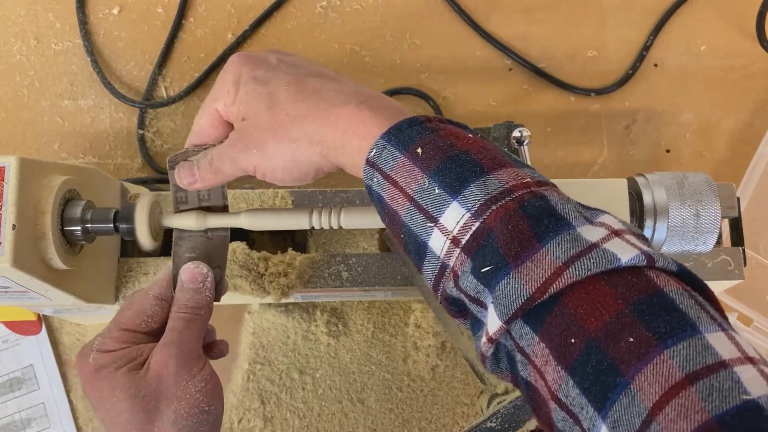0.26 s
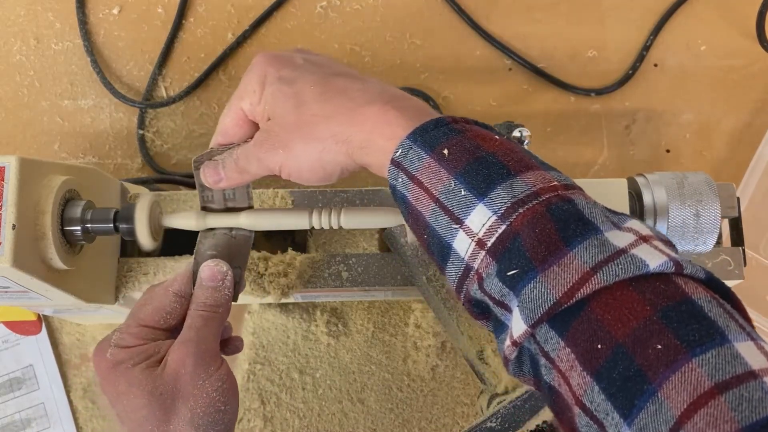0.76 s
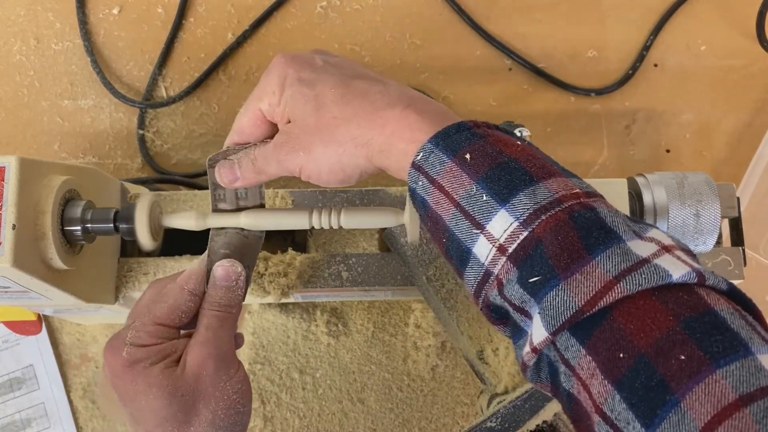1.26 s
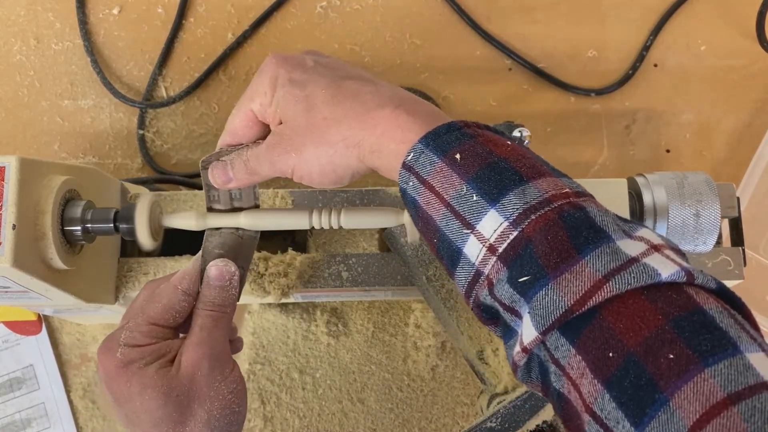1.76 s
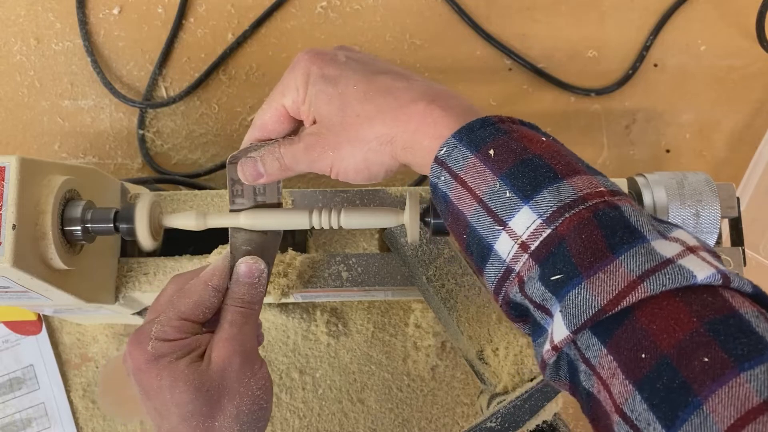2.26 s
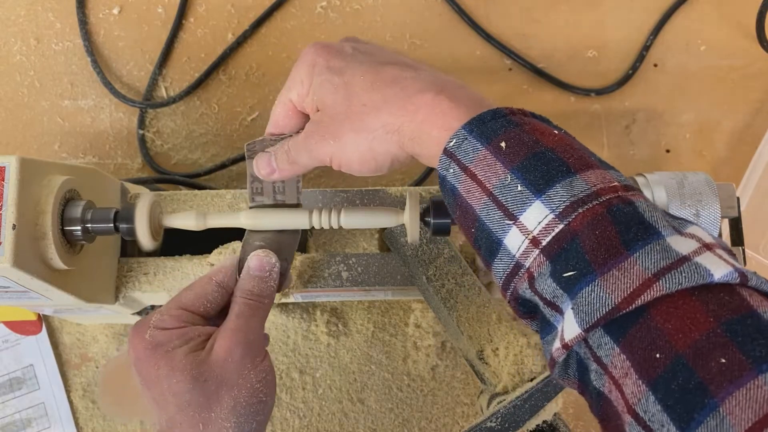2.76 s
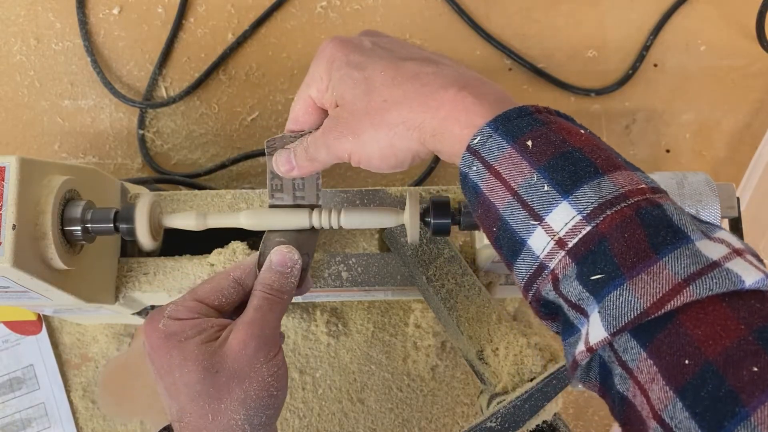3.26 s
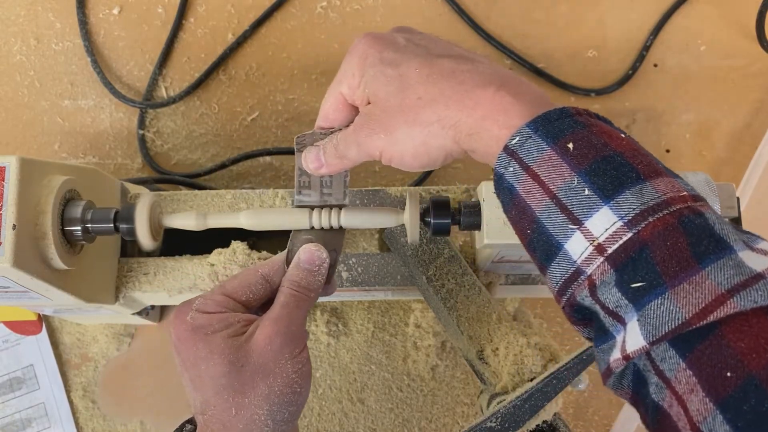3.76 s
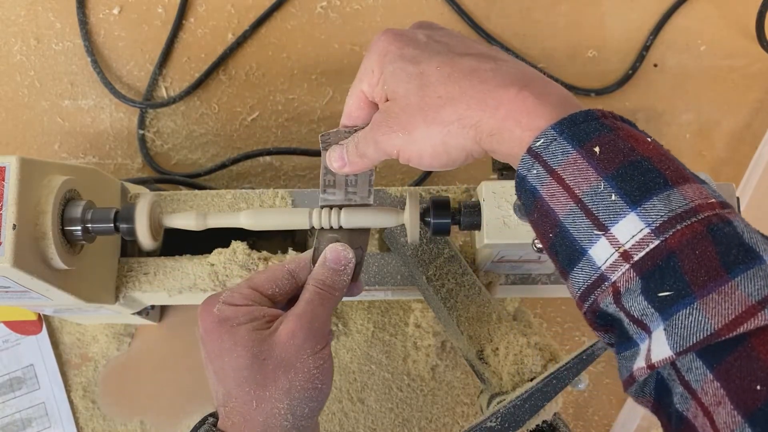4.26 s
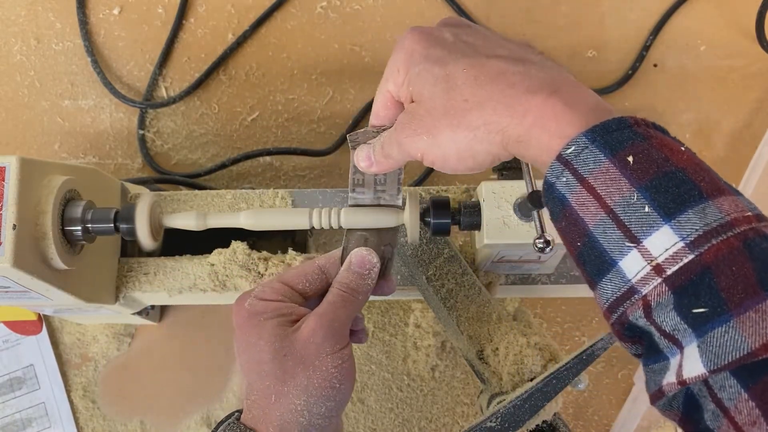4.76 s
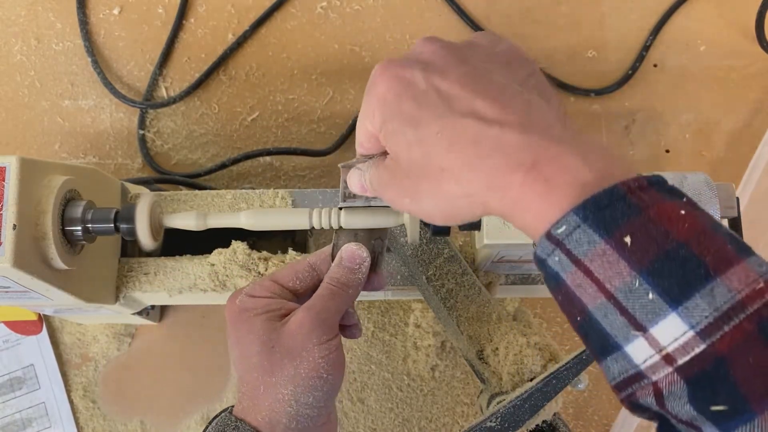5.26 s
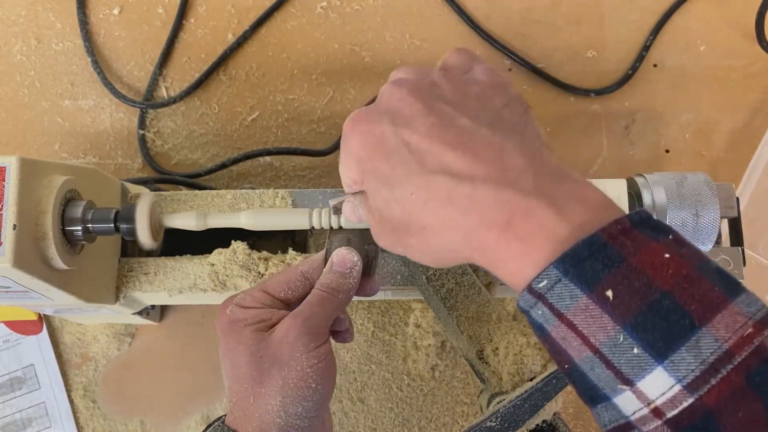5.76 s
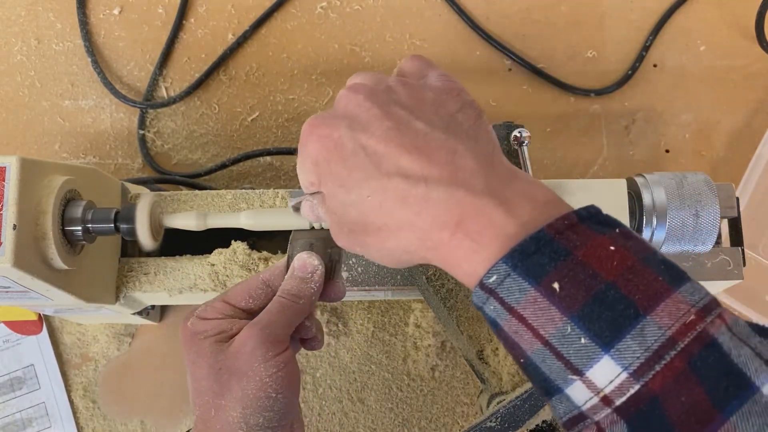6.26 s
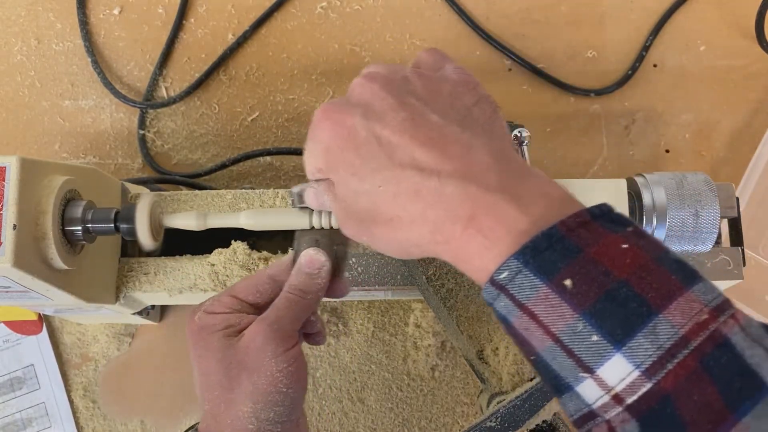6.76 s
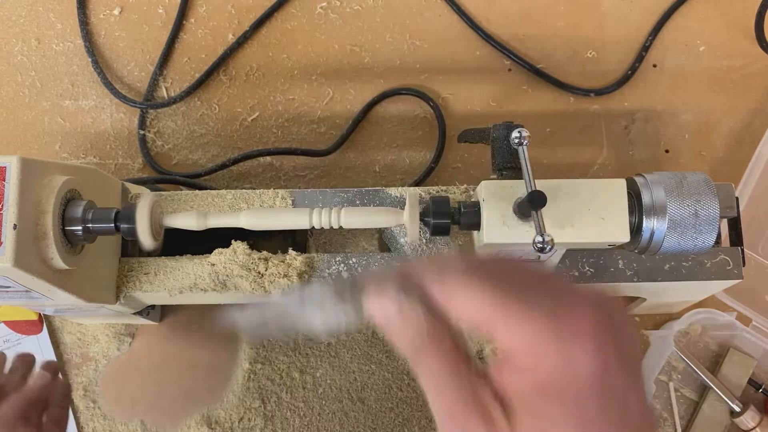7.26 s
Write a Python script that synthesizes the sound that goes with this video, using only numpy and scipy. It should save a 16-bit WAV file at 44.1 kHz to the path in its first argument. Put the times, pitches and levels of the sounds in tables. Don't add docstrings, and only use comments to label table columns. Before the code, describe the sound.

Steady throbbing motor hum and whirr with bright, gritty sandpaper hiss on thin turning wood; the hiss stops, then a sharp plastic click.

```python
import sys
import numpy as np
from scipy import signal
from scipy.fft import rfft, irfft, next_fast_len
from scipy.io import wavfile
from scipy.ndimage import uniform_filter1d, map_coordinates

SR = 44100
rng = np.random.default_rng(int(sys.argv[2]) if len(sys.argv) > 2 else 0)


def bounce(signal):
    frames = np.transpose(np.atleast_2d(signal))
    limited = np.clip(frames, -1, 1)
    pcm = np.round(limited * 32767).astype(np.int16)
    wavfile.write(sys.argv[1], SR, pcm)


def linear_from_db(decibels):
    return 10 ** (np.asarray(decibels, float) / 20)


N = 331632
TIME_S = np.arange(N) / SR
LIFT_S = 6.965
GRIP_EASES_S = (6.8, 6.9)


def unit(x):
    return x / np.sqrt(np.mean(x ** 2) + 1e-20)


def along(points, hz):
    f, v = np.transpose(points)
    return np.interp(np.log(hz + 1), np.log(f + 1), v)


def curves(rows):
    s, *columns = np.transpose(rows)
    return [np.interp(TIME_S, s, column) for column in columns]


def ramp(start_s, end_s):
    return np.clip((TIME_S - start_s) / (end_s - start_s), 0, 1)


def wobble(rate):
    knots = rng.standard_normal(int(N * rate / SR) + 4)
    return map_coordinates(knots, [np.arange(N) * rate / SR])


def filtered(x, response):
    m = next_fast_len(N + 8192)
    return irfft(rfft(x, m) * response(np.fft.rfftfreq(m, 1 / SR)), m)[..., :N]


def band(hz, centre_hz, width_hz):
    return 1j * hz * width_hz / (centre_hz ** 2 - hz ** 2 + 1j * hz * width_hz)


def patchy(patchy_db, grain_db=0):
    z = signal.stft(rng.standard_normal((2, N)), nperseg=512)[2]
    field = uniform_filter1d(rng.standard_normal(z.shape[1:]), size=8, axis=0)
    field = uniform_filter1d(field, size=10, axis=1)
    pair = signal.istft(z * linear_from_db(patchy_db * unit(field)), nperseg=512)[1][:, :N]
    return pair * linear_from_db(grain_db * wobble(600))


def colour(noise, spectrum):
    return unit(filtered(noise, lambda hz: linear_from_db(along(spectrum, hz))))


# time_s, speed_turns_per_s
SPINDLE_SPEED = [(0.0, 15.716), (0.45, 15.67), (1.35, 15.676), (1.8, 15.707), (2.25, 15.716), (2.7, 15.672),
                 (3.15, 15.569), (3.6, 15.597), (4.5, 15.603), (4.95, 15.579), (5.4, 15.647),
                 (5.85, 15.513), (6.3, 15.469), (6.75, 15.529), (6.9, 15.581), (7.05, 15.88), (7.2, 15.973),
                 (7.4, 15.987)]
# overtone_number, level_db
HUM_OVERTONES = [(1, 0), (2, -19), (3, -24.5)]
# hum_overtone_number, offset_turns, level_over_throb_db
THROB_SIDEBANDS = [(1, -3, -24), (1, -2, -24), (1, -1, -5), (1, 1, 0), (1, 2, -7), (2, -1, -14),
                   (3, -3, -29), (3, -2, -28), (3, -1, -15), (3, 1, -25), (4, -1, -26), (5, 1, -27),
                   (6, -1, -27)]
# multiple_of_spindle, peak_db, unsteadiness_db
GEARED_TONES = [(3.45, -41, 1), (4.23, -41, 2), (4.77, -43, 2), (5.77, -50, 2), (6.23, -47, 2.5),
                (6.55, -41, 1.5), (8, -44, 2.5), (8.5, -51, 2.5), (13.45, -50, 2), (27.77, -52, 2),
                (42, -58, 2), (47, -53, 1), (72.85, -59, 2)]
BEARING_MULTIPLES = (18.6, 23.05, 28)
# level_db, change_when_strip_taut_db, change_after_lift_db, beat_depth_0_to_1
BEARING_LEVELS = [(-39.5, -2.5, -15, 0.56), (-43.5, -6.5, 1, 0.06), (-49.5, 5.5, -9, 0.02)]
# pitch_hz, peak_db
MAINS_HUM = [(120, -44), (240.1, -47)]


def spindle_tones():
    bench_hz, bench_width_hz = 70, 7
    start_turn, light_touch_turns_per_s = -0.380, 15.7
    belt_turns_per_turn, belt_start_turn, belt_db = .231, -.424, -14.5
    beat_period_s, first_dip_s = 2.18, 0.25

    speed, = curves(SPINDLE_SPEED)
    turns = np.cumsum(speed) / SR
    angle = 2 * np.pi * (start_turn + turns)

    def bench_phase(k):
        return k * angle + np.angle(band(k * speed, bench_hz, bench_width_hz))

    def free_tone(k):
        return np.cos(k * angle + 6 * rng.random() + 0.15 * wobble(1.86))

    hum_db = -16.6 - 1.7 * ramp(0, LIFT_S) + 1.2 * ramp(*GRIP_EASES_S) - 7.5 * ramp(7.16, 7.4)
    throb_db = -27.5 - 7.5 * (speed - light_touch_turns_per_s)
    hum_phase = bench_phase(5)
    belt_angle = 2 * np.pi * (belt_start_turn + belt_turns_per_turn * turns)
    belt = 1 + linear_from_db(belt_db + .6 * wobble(1.2)) * np.exp(1j * belt_angle)
    hum = belt * sum(linear_from_db(hum_db + db) * np.exp(1j * m * hum_phase) for m, db in HUM_OVERTONES)
    out = hum.real

    for m, offset, db in THROB_SIDEBANDS:
        sideband = np.cos((m - 1) * hum_phase + bench_phase(5 + offset))
        out = out + linear_from_db(throb_db + db + .5 * wobble(2.5)) * sideband
    for k, db, sway_db in GEARED_TONES:
        out = out + linear_from_db(db + sway_db * wobble(1.62)) * free_tone(k)

    taut, lifted = ramp(2.45, 3.3), ramp(LIFT_S - .05, LIFT_S + 0.053)
    slow_beat = np.cos(2 * np.pi * (TIME_S - first_dip_s) / beat_period_s)
    for k, (db, taut_db, lift_db, depth) in zip(BEARING_MULTIPLES, BEARING_LEVELS):
        level_db = db + taut_db * taut + lift_db * lifted + 4.0 + 0.71 * wobble(9.1)
        out = out + linear_from_db(level_db) * (1 - depth * slow_beat) / (1 + depth) * free_tone(k)
    for hz, db in MAINS_HUM:
        out = out + linear_from_db(db + 0.5 * wobble(3.2)) * np.cos(2 * np.pi * hz * TIME_S)
    return out


# pitch_hz, width_hz
BENDING_MODES = [(1215, 13), (1400, 30), (1670, 49), (1980, 30)]
MODE_QUIET = [-58, -58, -52, -51.5]
# peak_s, length_s, mode_hz, level_db
CHATTER_BOUTS = [(0.0, 0.16, 1400, -44), (.8, 0.87, 1400, -42.5), (1.094, 0.19, 1220, -46),
                 (1.12, 0.2, 1980, -50), (1.3, 0.7, 1670, -55.5), (1.598, 0.17, 1400, -48),
                 (2.2, 0.27, 1220, -53), (2.344, 0.74, 1400, -43), (2.6, 1.5, 1980, -58),
                 (2.803, 0.72, 1670, -45.5), (2.95, 0.4, 1400, -51), (3.8, .55, 1220, -46),
                 (3.8, .35, 1400, -47), (3.795, 0.37, 1670, -45), (3.85, .8, 1980, -53),
                 (4.872, 0.19, 1670, -38.5), (4.87, 0.13, 1980, -38), (5.1, 0.32, 1980, -51),
                 (5.45, 0.4, 1400, -45), (5.5, 0.47, 1980, -45), (5.55, 0.65, 1670, -47.5),
                 (6.12, .4, 1670, -44), (5.95, .7, 1980, -45), (6.15, .3, 1400, -43),
                 (6.77, 0.22, 1670, -45), (6.845, 0.14, 1400, -47), (7.0, 0.65, 1980, -49.5),
                 (7.183, 0.19, 1220, -50), (7.465, 0.13, 1220, -48)]


def chatter():
    rise_share = 0.78
    t = np.arange(0, N, 64) / SR
    strengths = []
    for quiet_db, (centre_hz, _) in zip(MODE_QUIET, BENDING_MODES):
        strength = np.full(len(t), linear_from_db(quiet_db))
        for s, length_s, hz, db in CHATTER_BOUTS:
            if abs(hz - centre_hz) < 90:
                side = np.where(t < s, rise_share, 2 - rise_share)
                strength += linear_from_db(db - 24 * ((t - s) / (length_s * side)) ** 2)
        strengths.append(np.interp(TIME_S, t, strength))
    return strengths


# pitch_hz, width_hz, level_db
CASING_MODES = [(658, 35, -6), (696, 29, -6.5), (736, 3.4, -2.5), (1141, 9.1, -24), (1300, 8.6, 1),
                (1522, 35, -3), (1797, 11.6, 1), (2260, 24, -3), (2456, 18, 2), (2624, 33, -1.5),
                (2896, 38, -4), (3920, 7.4, -1), (4115, 25, -10), (4770, 41, -7.5), (5160, 15, -9),
                (5254, 14, -4), (5910, 28, -8), (7970, 50, -9.5), (11900, 30, -12), (12400, 120, -15.5)]
# frequency_hz, level_db_per_hz
RUMBLE_COLOUR = [(20, -20), (45, -14), (75, -5.5), (115, -2), (150, -12.5), (180, -15.5), (215, -12),
                 (260, -13.5), (330, -17.5), (450, -16.5), (520, -24.5), (900, -25.5), (1500, -63)]
# frequency_hz, level_db_per_hz
AIR_COLOUR = [(300, -88), (420, -5), (600, -16.5), (1000, -2), (1500, -1.5), (3000, -3.5), (3300, -5),
              (5500, -14), (8000, -5.5), (11000, -14.5), (15100, -16), (15250, -92)]


def motor():
    chatter_db = 10 * np.log10(np.sum(np.square(chatter()), axis=0))
    casing_db = -37 + 0.1 * (chatter_db + 42) + 1.5 * ramp(LIFT_S, LIFT_S + 0.25)
    drive = patchy(0.4)
    ringing = 0
    for k, (centre_hz, width_hz, db) in enumerate(CASING_MODES):
        mode = filtered(drive, lambda hz: band(hz, centre_hz, width_hz))
        ringing = ringing + (-1) ** k * linear_from_db(db + 1.03 * wobble(2.062)) * mode
    casing = linear_from_db(casing_db - 5) * unit(filtered(ringing, lambda hz: hz < 15200))
    air = linear_from_db(-43 + .5 * (casing_db + 40)) * colour(patchy(0.71), AIR_COLOUR)
    rumble = linear_from_db(-34) * colour(patchy(1.1), RUMBLE_COLOUR)
    return rumble + casing + air


# pitch_hz, width_hz, level_db
UNLOADED_MODES = [(1430, 30, -45), (2660, 25, -53), (2950, 60, -48), (4830, 25, -58), (5165, 30, -60)]


def workpiece():
    drive = patchy(1.47)

    def mode(centre_hz, width_hz):
        return unit(filtered(drive, lambda hz: band(hz, centre_hz, width_hz) * (hz < 9000)))

    held = sum(linear_from_db(-4.0) * level * mode(*m) for level, m in zip(chatter(), BENDING_MODES))
    eased = sum(linear_from_db(db) * mode(hz, width_hz) for hz, width_hz, db in UNLOADED_MODES)
    return held + ramp(*GRIP_EASES_S) * eased


# time_s, pressure_db, tautness_db
HAND_MOVES = [(0.05, 3.5, 1), (0.57, 2, -0.5), (0.85, 1.5, 0), (1.1, 0.5, 0), (1.8, 0, -1), (2.1, 1, -0.5),
              (2.5, -1, -1), (2.65, 1, -.5), (2.78, 1.5, 5.5), (3.2, 1, 6), (3.5, 2.5, 4.5),
              (3.9, 2.5, 0.5), (4.2, 2.5, 3.5), (4.85, -0.5, 4), (5.2, 3, 1), (5.45, -0.5, 1.5),
              (6.3, 1.5, .5), (6.93, -0.5, -1)]
# level_db, db_per_pressure_db, db_per_tautness_db, change_over_travel_db, grazing_db
RUB_LAYERS = [(-37, 2.02, 0.04, -1.4, -9.5), (-43, 0.37, 1.1, 0, -4), (-46.5, 0.75, 0.2, 4.5, -10)]
# time_s, added_scrape_db
EDGE_SNAGS = [
    (.63, 3),
    (1.87, 4),
    (5.15, 2.5),
]


def rub_db():
    press, taut = curves(HAND_MOVES)
    travel = ramp(0, LIFT_S)
    grazing = 1 - ramp(.575, .625)
    grit, dust, scrape = [db + a * press + b * taut + c * travel + graze_db * grazing
                          for db, a, b, c, graze_db in RUB_LAYERS]
    for s, db in EDGE_SNAGS:
        scrape = scrape + db * ramp(s - .03, s) * np.exp(-np.abs(TIME_S - s) / 0.06)
    return grit, dust, scrape


# frequency_hz, level_db_per_hz
GRIT_COLOUR = [(3500, -90), (4500, -25), (5900, 0), (6500, -2), (7500, .5), (10200, .5), (10800, -3),
               (12000, -4), (13500, -25), (14500, -90)]
# frequency_hz, level_db_per_hz
DUST_COLOUR = [(9500, -90), (10500, -25), (12300, -6), (13300, 0), (15780, 0), (15830, -100)]
# frequency_hz, level_db_per_hz
SCRAPE_COLOUR = [(1200, -90), (1500, -40), (3000, -2.5), (4500, 4), (5000, -4.5), (6000, 0), (7500, -22),
                 (9000, -88)]


def sandpaper():
    grit_db, dust_db, scrape_db = rub_db()
    touch = np.clip((LIFT_S - TIME_S) / 0.024, 0, 1)
    hand_db = .5 * wobble(8.6) + 0.21 * wobble(25)
    grit = linear_from_db(grit_db - 5.0 + hand_db) * colour(patchy(0.37, grain_db=1.5), GRIT_COLOUR)
    dust = linear_from_db(dust_db - 0.5 + hand_db) * colour(patchy(1.7, grain_db=0.5), DUST_COLOUR)
    scrape = linear_from_db(scrape_db - 1 + hand_db) * colour(patchy(0.8, grain_db=-0.1), SCRAPE_COLOUR)
    rest_db = -53.5 - 8 * ramp(0, LIFT_S) ** 2 + 0.73 * wobble(1.6)
    rest = linear_from_db(rest_db) * unit(filtered(patchy(1.3), lambda hz: band(hz, 3755, 32) ** 2))
    return touch * (grit + dust + scrape + rest)


# frequency_hz, level_db_per_hz
FAINT_HISS_COLOUR = [(4000, -40), (5300, 0), (7900, -3), (8400, -40), (11700, -40), (12400, -3), (15100, 0),
                     (15250, -90)]


def faint_hiss():
    return linear_from_db(-58) * colour(rng.standard_normal(N), FAINT_HISS_COLOUR)


# time_s, level_db
HIGH_HISSES = [
    (.778, -50),
    (1.732, -47),
    (3.425, -48),
]


def high_hisses():
    half_length_s, low_hz, high_hz = .012, 8900, 10800
    hiss = unit(filtered(rng.standard_normal(N), lambda hz: (hz > low_hz) & (hz < high_hz)))
    return hiss * sum(linear_from_db(db) * np.exp(-((TIME_S - s) / half_length_s) ** 2) for s, db in HIGH_HISSES)


def ring(modes, t):
    out = np.zeros(len(t))
    for hz, db, t60_s in modes:
        out += linear_from_db(db + rng.normal(0, 3.7) - 60 * t / t60_s) * np.sin(2 * np.pi * hz * t)
    return out


# time_s, peak_db, t60_s
SWITCH_CONTACTS = [
    (7.4818, -20, .02),
    (7.4836, -15, .02),
    (7.4874, -7.5, .009),
    (7.4900, -18, .02),
    (7.4940, -17, .018),
    (7.503, -30, .05),
]
# pitch_hz, level_db, t60_s
PLASTIC_MODES = [(1300, -1, .03), (1550, 1.5, .035), (1800, -4, .025), (2400, -4, .015), (2900, -6, .015),
                 (5700, -5, .008), (7600, -9, .005), (10500, -9, .006)]
# pitch_hz, level_db, t60_s
THUD_MODES = [(100, -19, .1), (300, -30, .1), (360, -26, .08), (620, -36, .05)]
# frequency_hz, level_db
CRACK_COLOUR = [(300, -35), (900, -14), (1300, 0), (3000, -2), (4200, -7), (7500, -5), (15500, -11),
                (16000, -30), (16700, -35), (16900, -100)]


def switch():
    t = np.arange(SR // 4) / SR
    snaps, jolt = np.zeros((2, N + SR)), np.zeros((2, N + SR))
    for s, db, t60_s in SWITCH_CONTACTS:
        envelope = linear_from_db(-60 * t / t60_s) * (1 - np.exp(-t / 0.00014))
        crack = envelope * rng.standard_normal((2, len(t)))
        start = round(s * SR)
        snaps[:, start:start + len(t)] += linear_from_db(db + 6) * (crack + 0.13 * ring(PLASTIC_MODES, t))
    start = round(7.4942 * SR)
    jolt[0, start:start + len(t)] = ring(THUD_MODES, t)
    return filtered(snaps[:, :N], lambda hz: linear_from_db(along(CRACK_COLOUR, hz))) + jolt[:, :N]


# frequency_hz, likeness_0_to_1
PORT_LIKENESS = [(40, 0.97), (100, 1), (300, 0.88), (600, 0.46), (1500, 0.74), (3500, 0.9), (5000, 1),
                 (7000, 0.84), (9000, 1), (11500, 0.94), (12500, 0.82), (15500, 0.68)]


def scene():
    steady = motor() + workpiece() + sandpaper()
    steady[0] += spindle_tones()
    pair = filtered(steady, lambda hz: hz < 15830) + switch()

    def spread(hz):
        return np.arccos(np.clip(along(PORT_LIKENESS, hz), -1, 1)) / 2

    same, other = filtered(pair, lambda hz: np.array([np.ones_like(hz), np.sin(spread(hz))]))
    same = same - filtered(pair[0], lambda hz: 1 - np.cos(spread(hz)))
    ports = np.array([same + other, same - other])
    lag_s, sides = 48e-6, np.array([[-1], [1]])
    ports = filtered(ports, lambda hz: np.exp(1j * np.pi * hz * lag_s * sides))
    return ports * linear_from_db(.12 * sides) + high_hisses() + faint_hiss()


def roll_off(x):
    return signal.sosfilt(signal.butter(12, 16990, fs=SR, output="sos"), x)


def record(dry):
    return roll_off(dry)


dry = scene()
out = record(dry)
bounce(out)
```